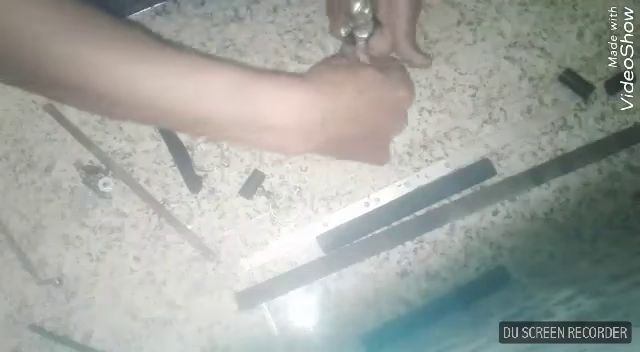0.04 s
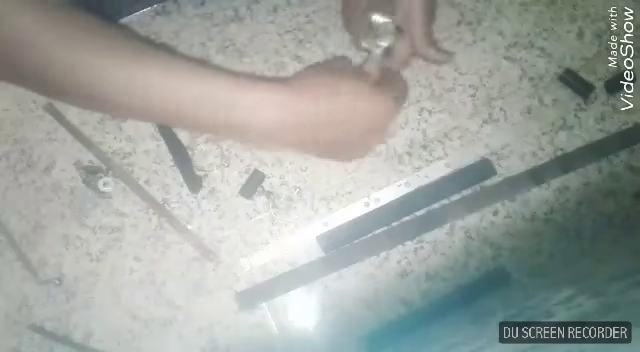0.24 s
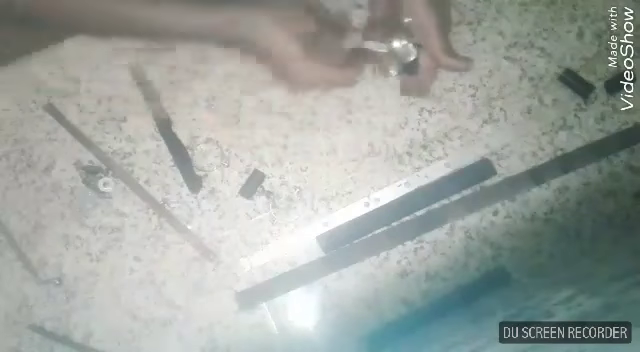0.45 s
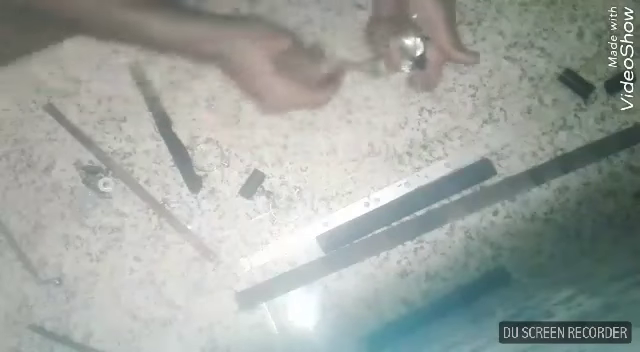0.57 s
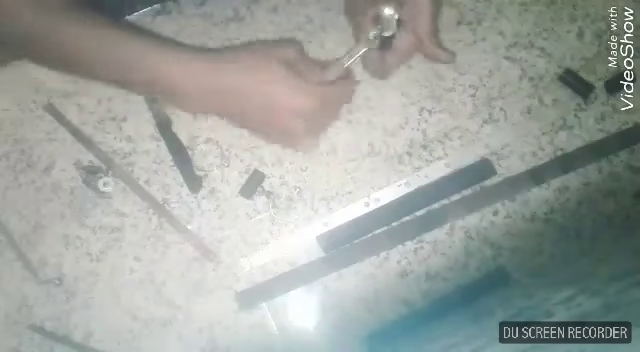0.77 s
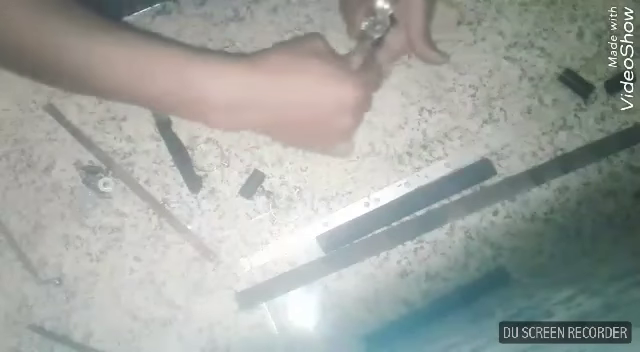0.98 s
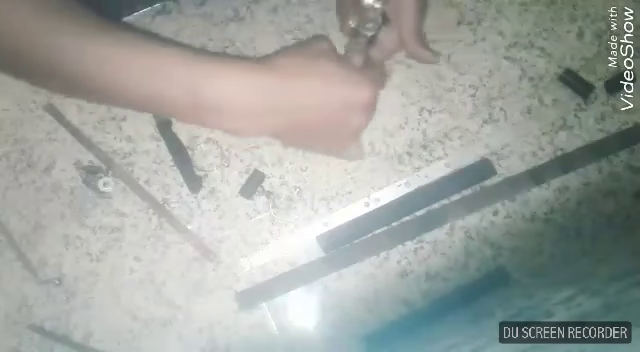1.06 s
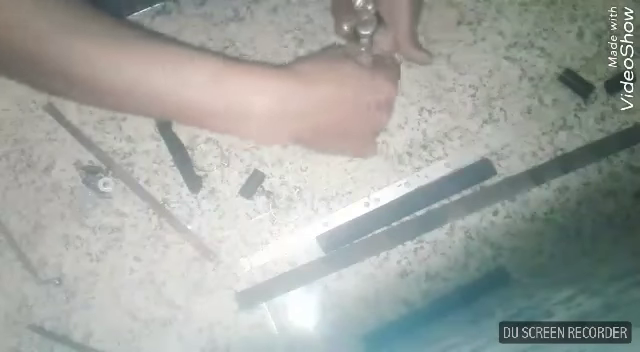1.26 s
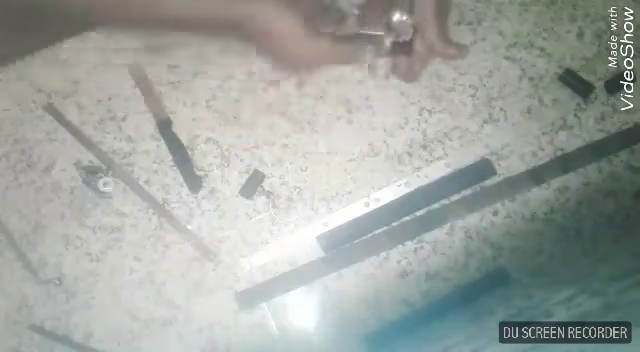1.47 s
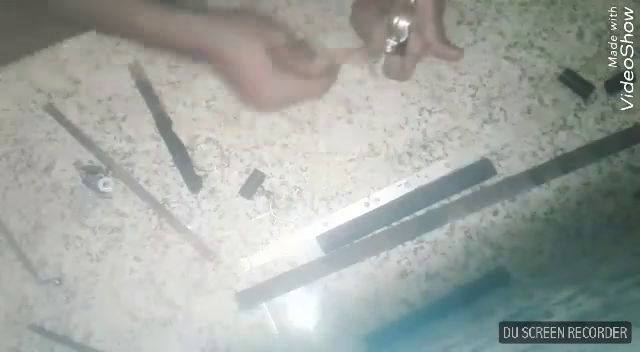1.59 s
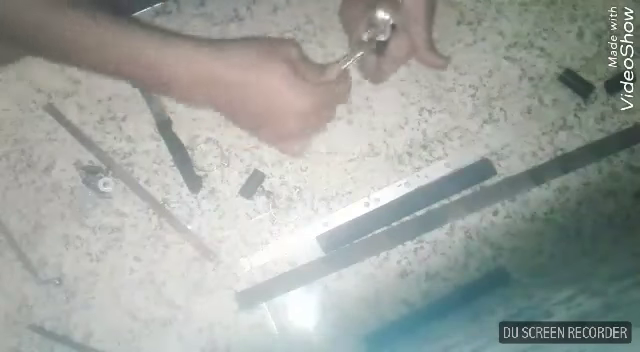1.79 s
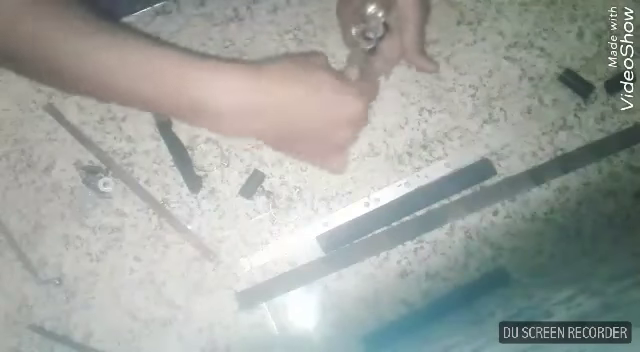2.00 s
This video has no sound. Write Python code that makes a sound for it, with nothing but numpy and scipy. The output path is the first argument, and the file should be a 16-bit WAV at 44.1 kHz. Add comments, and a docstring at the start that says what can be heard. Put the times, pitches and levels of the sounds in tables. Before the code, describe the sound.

A spanner clinks and clacks on a nut, with a brief scrape of metal on stone.

```python
"""A spanner is set on a nut, pulled round and lifted off, on a stone floor in a hard, echoing room.
Each contact clacks and rings the bracket, bolt, spanner, washer and nut.
During the pull the bracket scrapes and bumps on the floor.
An expander cuts the echoes short and turns the room's drone down between the sounds."""
import sys
import numpy as np
from scipy import signal
from scipy.fft import rfft, irfft, next_fast_len
from scipy.io import wavfile

SR = 44100
rng = np.random.default_rng(int(sys.argv[2]) if len(sys.argv) > 2 else 0)


def wav_record(signal):
    """Record a signal, one row per channel, as 16-bit PCM in the file named by sys.argv[1]."""
    frames = np.transpose(np.atleast_2d(signal))
    bounded = np.clip(frames, -1, 1)
    # unit amplitude maps onto the largest positive 16-bit level
    quanta = np.round(bounded * 32767).astype(np.int16)
    wavfile.write(sys.argv[1], SR, quanta)


N = 89611

# steel contacts: t/s, clack level/dB, clack tilt/(dB/octave),
# ring level/dB of bracket, bolt, spanner, washer, nut; rattle decay/s, nut direct gain/dB
STEEL_CONTACTS = [(0.2132, -43, 0.9, -45.5, -59, -50.5, -68, -63, 0.0088, -0.5),
                  (0.2813, -45.5, -1.8, -50, -54, -56.5, -74, -80, 0.0025, -11),
                  (0.493, -63.5, 5, -65.5, -78, -76, -79, -85, 0.0028, -8),
                  (0.7672, -56, -3, -66, -53.5, -69.5, -77, -58, 0.0014, -9),
                  (0.7785, -42, 0.5, -64, -50.5, -46.5, -57, -41, 0.0035, 2),
                  (1.1384, -44, -0.5, -45.5, -53, -72, -71, -57, 0.011, -8),
                  (1.1825, -41.5, 3.5, -54, -75, -49, -66, -64, 0.0016, 5),
                  (1.214, -51, -1.3, -54, -62, -75, -76, -71, .012, -6),
                  (1.396, -58, -1, -72, -72.5, -78, -82, -72, 0.007, -6.5),
                  (1.5351, -43.5, -2.5, -48, -59, -47, -70, -54, 0.021, -3.5),
                  (1.7839, -31, 4, -37.5, -51.5, -39, -31.5, -28.5, 0.0082, -8.5),
                  (1.948, -58, -8, -58, -60, -64, -64, -58.5, 0.0026, 9.5)]
# clack spectrum: f/Hz, level/dB
CLACK_SPECTRUM = [(100, -20.5), (300, -18), (560, -8.5), (950, -19), (1500, -11.5), (2050, -5.5), (3000, 0),
                  (3700, -2.5), (4600, 1), (5800, -2), (6600, -4.5), (8300, -1.5), (9800, -11),
                  (11300, -6.5), (13500, -29), (15300, -23)]
# modes of each part: f/Hz, level/dB, t60/s
BRACKET_MODES = [(561, -6.5, 0.02), (1455, -2.5, 0.024), (1604, -0.5, 0.034), (4267, 0, 0.022),
                 (4693, -4, 0.033), (5560, -6, 0.027), (6060, -5.5, 0.093)]
BOLT_MODES = [(1777.4, 0.5, 0.049), (2633, -9.5, 0.077), (2984, -2.5, 0.12)]
SPANNER_MODES = [(7274, 3, 0.061), (10580, -7.5, 0.087), (11120, -15.5, 0.037)]
WASHER_MODES = [(8380, -1.5, 0.0055), (8770, -1.5, .01), (12300, -2, 0.0074)]
NUT_MODES = [(7795, -3.5, 0.0092), (8076, 1, 0.02), (8310, -7.5, 0.019)]


def spanner_contacts():
    """Steel meets steel: a clack with tiny bounces, and five parts ring."""
    out, t = np.zeros(N), np.arange(SR // 10) / SR
    for start_s, clack_db, tilt_db, *rings_db, nut_db, rattle_s, nut_direct_db in STEEL_CONTACTS:
        rattle = rng.standard_normal(len(t)) * np.exp(-t / rattle_s)
        hit = at_level(coloured(rattle, CLACK_SPECTRUM, tilt_db), clack_db)
        for modes, db in zip((BRACKET_MODES, BOLT_MODES, SPANNER_MODES, WASHER_MODES), rings_db):
            hit += at_level(ring(modes, t), db)
        add(out, start_s, room(hit, direct_db=-8))  # shaded by the hands
        nut = at_level(ring(NUT_MODES, t), nut_db)
        add(out, start_s, room(nut, nut_direct_db))
    return out


def ring(modes, t, detune=0.0021, attack_s=0.00035):
    """Damped modes of a struck part, a little different at each blow."""
    tones = np.zeros(len(t))
    for hz, db, t60 in modes:
        envelope = amp(db + rng.normal(0, 1) - 60 * t / t60) / np.sqrt(t60)
        detuned_hz = hz * (1 + detune * rng.normal())
        tones += envelope * np.sin(2 * np.pi * (detuned_hz * t + rng.random()))
    return tones * (1 - np.exp(-t / attack_s))


# course of the pull: t/s, relative scrape level/dB, binding share (0-1), relative grit level/dB
PULL_CURVE = [(1.0, -69, 0.8, -79), (1.025, -49.5, 0, -62), (1.055, -48.5, 0.1, -49),
              (1.088, -43, 0, -50.5), (1.125, -48, 0.08, -52), (1.18, -48, 0.94, -73),
              (1.24, -47.5, .95, -69), (1.31, -50.5, 0.95, -61), (1.36, -53, 0.94, -68),
              (1.42, -66, 0.9, -57.5), (1.45, -74, 0.3, -92)]
# friction spectra: f/Hz, level/dB
SLIDING_SPECTRUM = [(80, -19), (200, -16.5), (480, -13.5), (610, 6), (690, -7), (780, 3.5), (920, -9.5),
                    (1100, -6.5), (1500, -23), (4000, -32.5)]
BINDING_SPECTRUM = [(70, -29), (120, -14), (250, -14.5), (352, 6), (430, -6.5), (570, -5), (700, -12.5),
                    (840, -10), (1100, -21), (4000, -39)]
GRIT_SPECTRUM = [(900, -16), (2000, -9), (2450, -17), (2950, -2.5), (3400, -20.5), (4200, 2.5), (4750, -10),
                 (5200, -35), (6600, -5.5), (7100, -16), (9000, -23), (15000, -32)]


def bracket_scrape():
    """The bracket drags over the stone, deeper as the nut binds."""
    times_s, *columns = np.transpose(PULL_CURVE)
    scrape_db, share, grit_db = [np.interp(np.arange(N) / SR, times_s, c) for c in columns]
    sliding = np.sqrt(1 - share) * friction(SLIDING_SPECTRUM)
    binding = np.sqrt(share) * friction(BINDING_SPECTRUM)
    grit = amp(grit_db) * friction(GRIT_SPECTRUM)
    drag = amp(scrape_db) * (sliding + binding) + grit
    return 0.49 * room(drag, direct_db=2.5)[:N]


def friction(spectrum, slips_per_s=2000):
    """Dense irregular slips of uneven size, filtered, at rms 1."""
    slips = (rng.random(N) < slips_per_s / SR) * rng.standard_normal(N)
    return unit_rms(coloured(slips, spectrum))


# knocks on the floor: t/s, relative level/dB
FLOOR_BUMPS = [(1.013, -50), (1.022, -51.5), (1.232, -49.5), (1.299, -50), (1.381, -54), (1.408, -53.5)]
# knock spectrum: f/Hz, level/dB
BUMP_SPECTRUM = [(60, -17.5), (120, -1.5), (180, -2.5), (250, -5), (345, 9), (460, -8.5), (600, -4),
                 (1000, -16.5), (2500, -24.5), (9000, -50)]


def bracket_bumps(decay_s=0.0091):
    """The bracket rocks on the floor with dull knocks."""
    out, t = np.zeros(N), np.arange(SR // 10) / SR
    for start_s, db in FLOOR_BUMPS:
        burst = rng.standard_normal(len(t)) * np.exp(-t / decay_s)
        knock = at_level(coloured(burst, BUMP_SPECTRUM), db)
        add(out, start_s, 0.5 * room(knock, direct_db=1))
    return out


# reverberation time: f/Hz, t60/s
ROOM_T60 = [(120, 0.55), (400, 0.8), (1500, 0.69), (4500, 0.7), (8000, 0.59), (12000, 0.41), (16000, 0.57)]


def room(x, direct_db, build_s=0.0016, early_gain=0.51, early_s=0.0067):
    """Direct sound plus a fresh diffuse tail; near walls strengthen its start."""
    hz, frame_s, noise = signal.stft(rng.standard_normal(SR // 2), SR, nperseg=256)
    decay = amp(-60 * frame_s / log_interp(ROOM_T60, hz)[:, None])
    tail = signal.istft(noise * decay, SR, nperseg=256)[1]
    t = np.arange(len(tail)) / SR
    tail *= (1 - np.exp(-t / build_s)) * (1 + early_gain * np.exp(-t / early_s))
    tail /= np.linalg.norm(tail)
    tail[0] += amp(direct_db)
    return signal.fftconvolve(x, tail)


# room noise spectrum: f/Hz, level/dB
DRONE_SPECTRUM = [(25, -8), (60, -18.5), (90, -7.5), (118, -2.5), (145, -13), (175, -2.5), (240, -9),
                  (340, -7.5), (600, -13), (1000, -19), (2000, -17), (5000, -24), (15000, -30)]


def room_drone(level_db=-58.5):
    """Steady low drone and faint hiss of the room."""
    return amp(level_db) * unit_rms(coloured(rng.standard_normal(N), DRONE_SPECTRUM))


def amp(db):
    """Gain of a level in dB."""
    return 10 ** (np.asarray(db) / 20)


def unit_rms(x):
    """x at rms 1."""
    return x / np.sqrt(np.mean(x ** 2) + 1e-20)


def at_level(x, db):
    """x with the energy of 50 ms at the given level."""
    return amp(db) * x * np.sqrt(0.05 * SR / np.sum(x ** 2))


def log_interp(points, hz):
    """(f/Hz, value) points read on a log frequency axis."""
    f, values = np.transpose(points)
    return np.interp(np.log(hz + 1), np.log(f + 1), values)


def coloured(x, spectrum, tilt_db=0):
    """Minimum-phase filter; tilt_db per octave acts above 1 kHz and pivots at 4 kHz."""
    taps = 4096
    hz = np.fft.rfftfreq(taps, 1 / SR)
    gain_db = log_interp(spectrum, hz) + tilt_db * np.log2(np.maximum(hz, 1000) / 4000)
    cepstrum = irfft(np.log(amp(gain_db)), taps)
    cepstrum[1:taps // 2] *= 2
    cepstrum[taps // 2 + 1:] = 0
    impulse = irfft(np.exp(rfft(cepstrum)), taps)
    return signal.oaconvolve(x, impulse)[:len(x)]


def add(track, start_s, x):
    """Mix x into the track from start_s."""
    part = track[round(start_s * SR):][:len(x)]
    part += x[:len(part)]


def scene():
    """Spanner work over the room's drone, mono."""
    drone = room_drone()
    return (spanner_contacts() + bracket_scrape() + bracket_bumps() + drone)[None]


def record(dry):
    """An expander lowers quiet moments; a steep low-pass follows."""
    sense_hz, sense_s = 296, 0.004
    knee_db, knee_width_db, range_db = -53, 2, 18
    top_hz, edge_hz = 16200, 500
    sidechain = signal.sosfilt(signal.butter(2, sense_hz, 'high', fs=SR, output='sos'), dry)
    pole = np.exp(-1 / (sense_s * SR))
    level_db = 10 * np.log10(signal.lfilter([1 - pole], [1, -pole], sidechain ** 2) + 1e-12)
    cut_db = range_db * (1 - np.tanh((level_db - knee_db) / (2 * knee_width_db))) / 2
    expanded = dry * amp(-cut_db)
    size = next_fast_len(N + SR // 2)
    lowpass = np.clip((top_hz - np.fft.rfftfreq(size, 1 / SR)) / edge_hz, 0, 1)
    return irfft(rfft(expanded, size) * lowpass, size)[:, :N]


dry = scene()
out = record(dry)
wav_record(out)
```